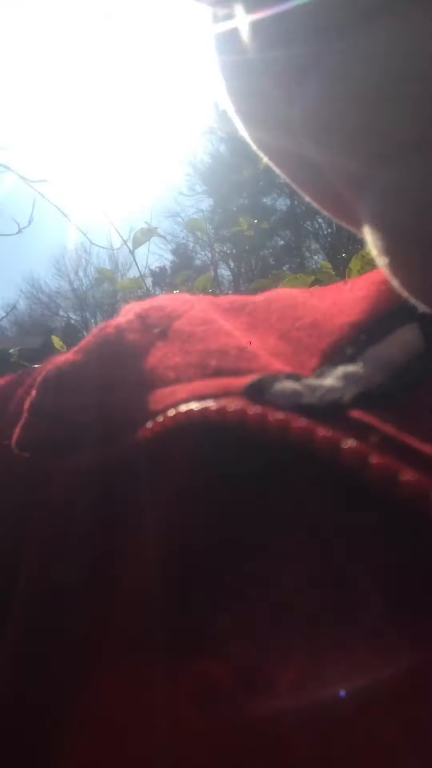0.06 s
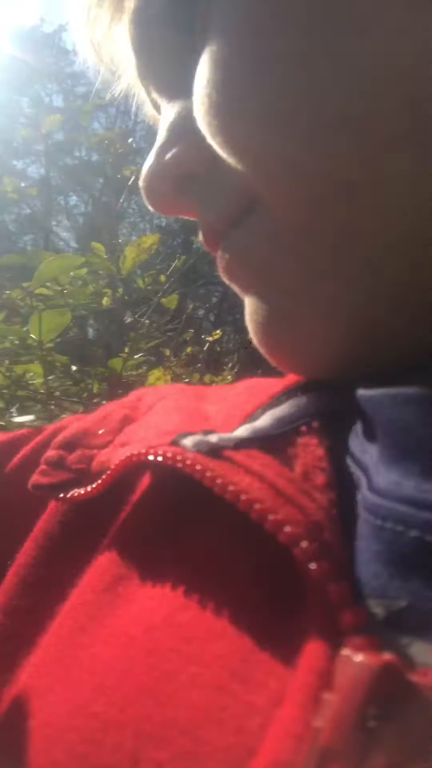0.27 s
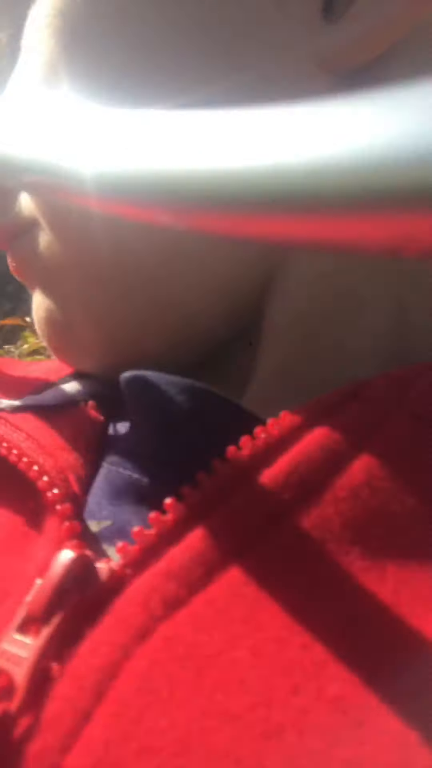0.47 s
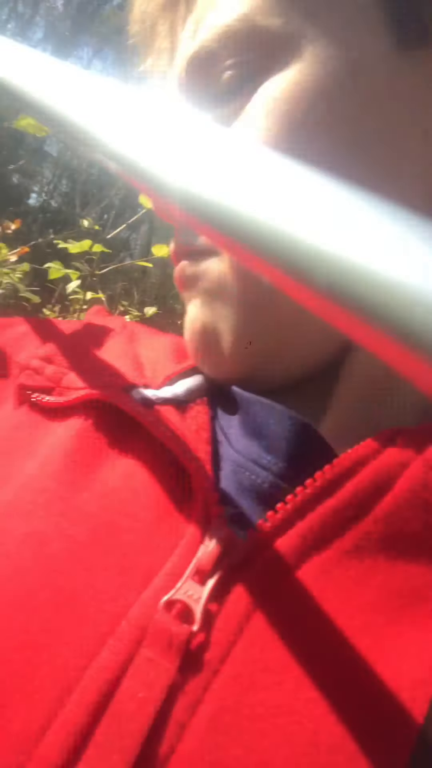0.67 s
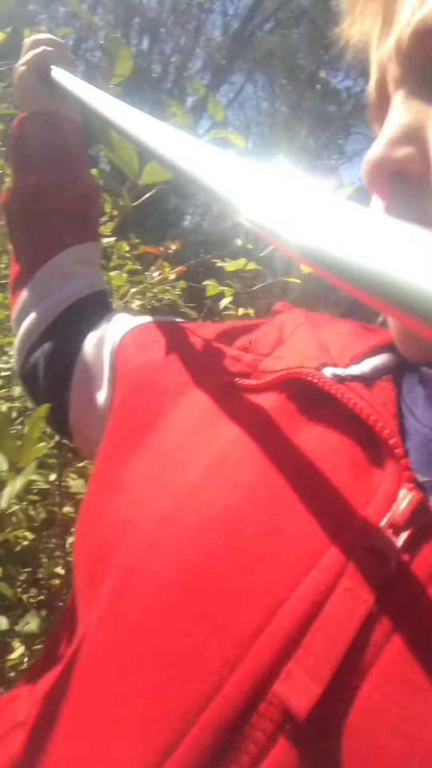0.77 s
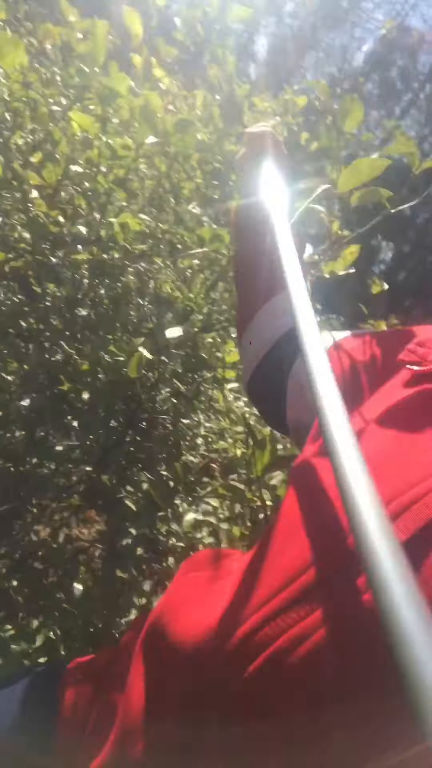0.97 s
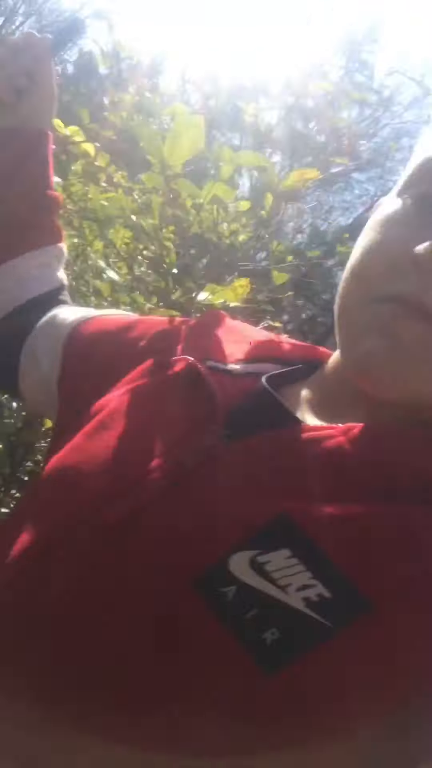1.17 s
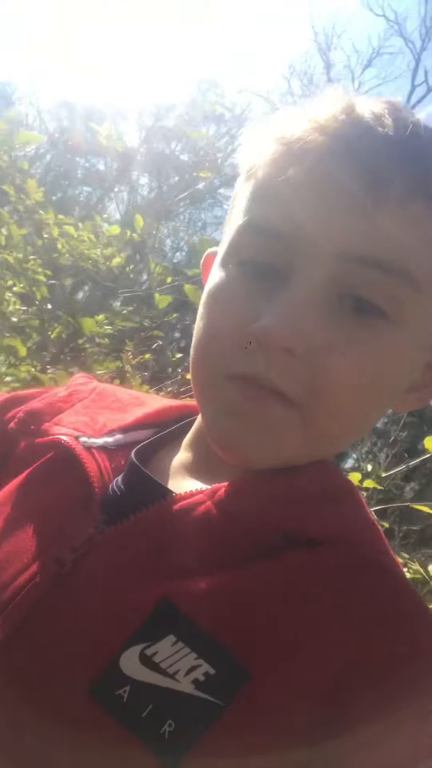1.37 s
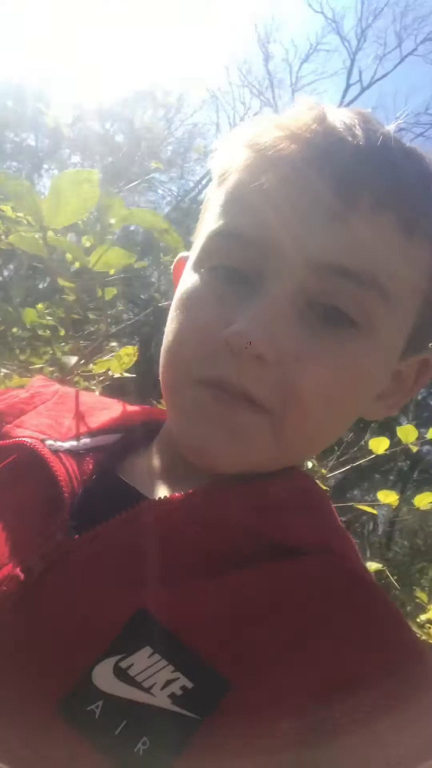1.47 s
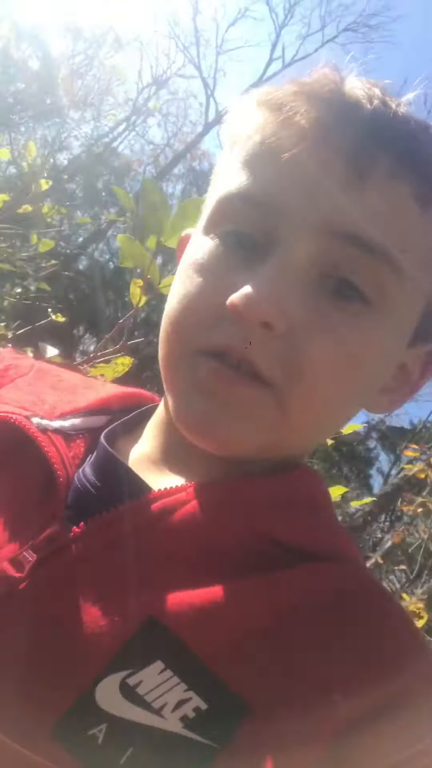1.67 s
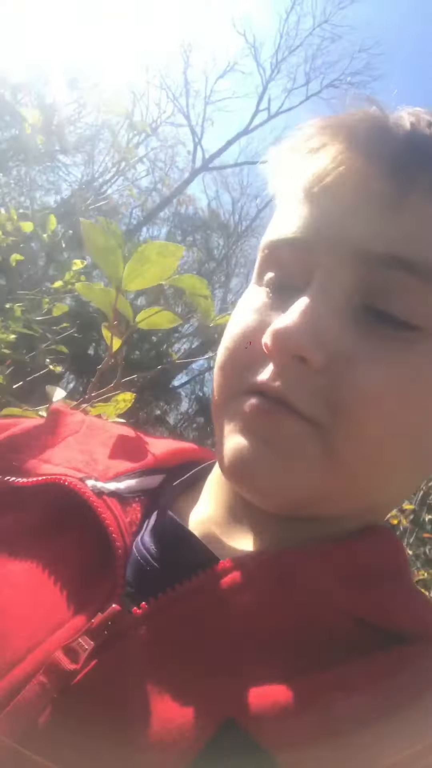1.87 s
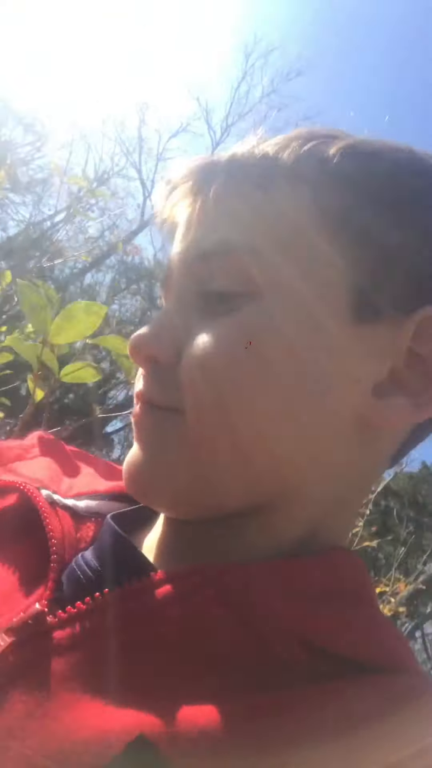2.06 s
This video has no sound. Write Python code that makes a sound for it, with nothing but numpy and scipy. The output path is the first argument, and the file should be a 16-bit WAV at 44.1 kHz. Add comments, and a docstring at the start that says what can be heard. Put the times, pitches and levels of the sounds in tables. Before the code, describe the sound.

A stick cracks loudly close to the microphone in a wood. Dry leaves then swish and crinkle as someone pushes through, with small twigs snapping. Soft air, a faint distant engine throb and one thin bird call lie behind.

```python
"""Pushing through dry brush

A stick cracks close by in a wood, in two jolts that ring it and tear its fibres, and the gain control
ducks for a moment. Leaves then swish and crinkle past, dotted with snapping twigs and one ringing tick.
Behind it sit a bed of soft air, a far throb like an idling engine and one thin call from a small bird."""
import sys
import numpy as np
from scipy import signal
from scipy.fft import rfft, irfft
from scipy.io import wavfile
from scipy.ndimage import minimum_filter1d

SR = 44100
rng = np.random.default_rng(int(sys.argv[2]) if len(sys.argv) > 2 else 0)


def to_wav(s):
    """Save 16-bit WAV."""
    ch = np.atleast_2d(s).T  # columns
    pcm = np.round(np.clip(ch, -1, 1) * 32767)  # PCM
    wavfile.write(sys.argv[1], SR, pcm.astype(np.int16))


N = 92610
T = np.arange(N) / SR

# tone of the air in the wood: frequency_hz, relative_db
AIR_SPECTRUM = [(20, -22.5), (40, -2), (90, 0.5), (160, -7.5), (300, -8), (600, -15.5), (1200, -20),
                (2500, -27.5), (6000, -27), (10500, -35), (16000, -30.5)]
# harmonics of the far engine: multiple, rms_db
ENGINE_HARMONICS = [(2, -65), (3, -61.5), (4, -72.5), (5, -78), (6, -72), (8, -78)]
# how hard the brush is swept: time_s, level_db
BRUSH_LEVELS = [(0, -67.5), (.3, -63.5), (.45, -64), (.55, -61.5), (.65, -59), (.72, -51), (.83, -51.5),
                (.92, -49.5), (1.0, -49), (1.08, -50.5), (1.14, -58), (1.18, -53), (1.24, -62),
                (1.42, -62.5), (1.58, -69), (1.76, -66), (1.82, -60), (1.91, -64), (2.0, -59), (2.1, -62)]
# tone of dry leaves: frequency_hz, relative_db
LEAF_SPECTRUM = [(200, -4), (500, -1), (1100, 0.5), (2000, -1.5), (3200, 0), (5000, -1), (7000, 0.5),
                 (10500, -5.5), (13000, -0.5), (16000, -8.5)]
# twigs breaking: start_s, level_db, t60_s, body_relative_db
TWIG_SNAPS = [(0.1555, -55.5, 0.023, 6.5), (0.3967, -46, 0.022, -3), (0.4092, -37, .012, -18),
              (0.442, -46, 0.017, -1), (.4585, -54.5, 0.021, 2), (0.5067, -45, 0.013, -1),
              (0.5861, -48.5, 0.0084, -2), (.7102, -43, .014, -5), (0.855, -46, .014, 2),
              (0.9122, -39, .025, -4.5), (0.9372, -38.5, 0.023, -6.5), (.9533, -28, .022, -6),
              (.9795, -36.5, 0.016, -14), (1.061, -42, 0.011, -10), (1.0813, -35.5, .02, -0.5),
              (1.0985, -35.5, .012, -18), (1.1733, -47, 0.018, -0.5), (1.41, -52.5, 0.016, -2),
              (1.868, -50, 0.027, -2.5), (2.0856, -44.5, 0.013, -8)]
# bright edge of a snap: frequency_hz, relative_db
EDGE_SPECTRUM = [(1000, -43), (2500, -8.5), (4500, -4), (7500, 0), (10000, -2.5), (12000, -3),
                 (15500, -7.5)]
# woody body of a snap: frequency_hz, relative_db
BODY_SPECTRUM = [(300, -5), (700, -11.5), (1200, 0), (1800, -1.5), (3000, -4), (5000, -11), (9000, -26)]
# ring of the one hard tick: pitch_hz, relative_db, t60_s
TICK_RESONANCES = [(3740, -1, .06), (4520, -3, .035), (6700, -2, .04), (11100, -6, 0.039)]
# the stick giving way: start_s, level_db, contact_s
STICK_JOLTS = [(0.2303, 2, 0.000021), (0.2317, -5.5, 0.00021)]
# ring of the stick: pitch_hz, relative_db, t60_s
STICK_RESONANCES = [(228, -40.5, .03), (539, -31.5, 0.043), (659, -23, 0.037), (1188, -20, 0.015),
                    (1578, -25.5, 0.028), (1677, -9.5, 0.0055), (2230, -41, 0.039), (2890, -32.5, 0.046),
                    (3750, -31.5, .028), (4430, -30.5, 0.021), (5413, -33, 0.03), (6860, -28, 0.021),
                    (9130, -11, 0.0013), (13500, -20.5, 0.00122)]
# fibres tearing in the crack: frequency_hz, relative_db
SPLINTER_SPECTRUM = [(150, 2.5), (500, -14), (1500, 4), (3000, -5.5), (6000, -6), (9000, -12.5),
                     (11500, -21), (15000, -17)]

ENGINE_HZ, ENGINE_WANDER, ENGINE_WAVER_DB = 20.48, .015, 2.5
BIRD_START_S, BIRD_LENGTH_S, BIRD_DB, BIRD_FLUTTER_DB = 0.013, .18, -61.5, 3.2
BIRD_TOP_HZ, BIRD_TOP_AT_S, BIRD_ARCH_HZ, BIRD_QUAVER_HZ = 5870, .085, 419, 60
SWISH_DB, CRINKLE_DB, CRINKLES_PER_S, CRINKLE_SPREAD_DB = -1.5, -4.5, 1400, 4
SPLINTER_DB, SPLINTER_T60_S, ECHO_DB, ECHO_T60_S = -21.5, 0.025, -48, .22
DUCK_THRESHOLD_DB, DUCK_SHARE = -16, 0.62
DUCK_ATTACK_S, DUCK_HOLD_S, DUCK_RELEASE_DB_PER_S = 0.017, 0.17, 101
CUTOFF_HZ = 16100


def from_db(db):
    """Decibels to gain."""
    return 10 ** (np.asarray(db) / 20)


def unit_rms(x):
    """Scale to rms 1."""
    return x / np.sqrt(np.mean(x ** 2) + 1e-20)


def coloured(x, spectrum):
    """EQ a signal with a curve, rolling off below its lowest point; rms 1."""
    hz, db = np.transpose(spectrum)
    bin_hz = np.maximum(np.fft.rfftfreq(N, 1 / SR), 1)
    curve = from_db(np.interp(np.log(bin_hz), np.log(hz), db))
    low_cut = np.minimum(bin_hz / hz[0], 1) ** 2
    return unit_rms(irfft(rfft(x) * curve * low_cut, N))


def noise(spectrum):
    """Coloured noise; rms 1."""
    return coloured(rng.standard_normal(N), spectrum)


def drift(rate_hz):
    """Smooth random modulation; rms 1."""
    pole = np.exp(-2 * np.pi * rate_hz / SR)
    return unit_rms(signal.lfilter([1], [1, -2 * pole, pole * pole], rng.standard_normal(2 * N))[N:])


def ring(clicks, hz, t60):
    """A resonator: a unit click starts a decaying sine of height 1."""
    pole, step = np.exp(-np.log(1000) / (t60 * SR)), 2 * np.pi * hz / SR
    return signal.lfilter([0, np.sin(step)], [1, -2 * pole * np.cos(step), pole * pole], clicks + 1e-18)


def click(start_s, contact_s=1e-6):
    """A push of unit area, duller the longer the contact."""
    pole = np.exp(-1 / (contact_s * SR))
    return signal.lfilter([1 - pole], [1, -pole], (np.arange(N) == int(start_s * SR)) + 1e-18)


def burst(start_s, t60, attack_s=0.00027):
    """Envelope with a sharp attack and an exponential decay."""
    age = np.maximum(T - start_s, 0)
    return (1 - np.exp(-age / attack_s)) * np.exp(-np.log(1000) * np.minimum(age / t60, 10))


def air(level_db=-60):
    """The air of the wood: a steady bed of noise, weighted to the lows."""
    return from_db(level_db) * noise(AIR_SPECTRUM)


def engine():
    """A far idle: only the low harmonics carry, each wavering in level."""
    phase = 2 * np.pi * np.cumsum(ENGINE_HZ * (1 + ENGINE_WANDER * drift(3))) / SR
    throb = np.zeros(N)
    for multiple, db in ENGINE_HARMONICS:
        level = np.sqrt(2) * from_db(db + ENGINE_WAVER_DB * drift(5.4))
        throb += level * np.sin(multiple * phase + rng.uniform(0, 2 * np.pi))
    return throb


def bird():
    """One thin, quavering whistle that arches in pitch and level."""
    droop = np.minimum((2 * (T - BIRD_TOP_AT_S) / BIRD_LENGTH_S) ** 2, 2)
    pitch_hz = BIRD_TOP_HZ - BIRD_ARCH_HZ * droop + BIRD_QUAVER_HZ * drift(150)
    progress = np.clip((T - BIRD_START_S) / BIRD_LENGTH_S, 0, 1)
    swell = np.sin(np.pi * progress ** 0.58)   # quick rise, longer fall
    level = from_db(BIRD_DB + BIRD_FLUTTER_DB * drift(40))
    return level * swell * np.sin(2 * np.pi * np.cumsum(pitch_hz) / SR)


def brush():
    """Leaves slide with a smooth swish and crinkle in tiny grains of many pitches."""
    sizes = from_db(CRINKLE_SPREAD_DB * np.minimum(rng.exponential(1, N), 4)) * rng.choice([-1, 1], N)
    grains = sizes * (rng.random(N) < CRINKLES_PER_S / SR)
    pitches_hz = np.geomspace(900, 15000, 16)
    pitch_index = rng.integers(0, len(pitches_hz), N)
    pings = sum(hz * ring(grains * (pitch_index == k), hz, t60=7 / hz) for k, hz in enumerate(pitches_hz))
    swish = from_db(SWISH_DB) * noise(LEAF_SPECTRUM)
    crinkle = from_db(CRINKLE_DB) * coloured(pings, LEAF_SPECTRUM)
    sweep = from_db(np.interp(T, *np.transpose(BRUSH_LEVELS)))
    return sweep * (swish + crinkle)


def twigs():
    """Each twig snaps in a noise burst with a bright edge and a woody body."""
    edge, body = noise(EDGE_SPECTRUM), noise(BODY_SPECTRUM)
    return sum(from_db(db) * burst(start_s, t60) * (edge + from_db(body_db) * body)
               for start_s, db, t60, body_db in TWIG_SNAPS)


def tick(start_s=1.0992, level_db=-42):
    """One harder tick among the twigs leaves a short, high ring."""
    hit = from_db(level_db) * click(start_s)
    return sum(from_db(db) * ring(hit, hz, t60) for hz, db, t60 in TICK_RESONANCES)


def stick():
    """Two quick jolts ring the stick; fibres tear, and the trees scatter a faint echo."""
    jolts = sum(from_db(db) * click(start_s, contact_s) for start_s, db, contact_s in STICK_JOLTS)
    body = sum((-1) ** k * from_db(db) * ring(jolts, hz, t60)   # modes alternate in polarity
               for k, (hz, db, t60) in enumerate(STICK_RESONANCES))
    crack_s = STICK_JOLTS[0][0]
    tear = from_db(SPLINTER_DB) * burst(crack_s, SPLINTER_T60_S)
    echo = from_db(ECHO_DB) * burst(crack_s, ECHO_T60_S)
    return body + noise(SPLINTER_SPECTRUM) * (tear + echo)


def scene():
    """Mono mix: close wood and leaves over the distant background."""
    return (stick() + twigs() + tick() + brush() + bird() + engine() + air())[None]


def record(dry):
    """Gain control ducks after a loud peak, holds and recovers; a steep low-pass trims the top."""
    level_db = 20 * np.log10(np.abs(dry[0]) + 1e-9)
    cut_db = DUCK_SHARE * np.maximum(level_db - DUCK_THRESHOLD_DB, 0)
    half_hold = int(DUCK_HOLD_S * SR / 2)
    held_db = -minimum_filter1d(-cut_db, 2 * half_hold + 1, origin=half_hold, mode="constant")
    release_ramp = DUCK_RELEASE_DB_PER_S * T
    released_db = np.maximum.accumulate(held_db + release_ramp) - release_ramp
    attack_pole = np.exp(-1 / (DUCK_ATTACK_S * SR))
    duck_db = signal.lfilter([1 - attack_pole], [1, -attack_pole], released_db)
    low_pass = signal.ellip(10, .1, 70, CUTOFF_HZ, fs=SR, output="sos")
    return signal.sosfilt(low_pass, dry * from_db(-duck_db))


dry = scene()
out = record(dry)
to_wav(out)
```